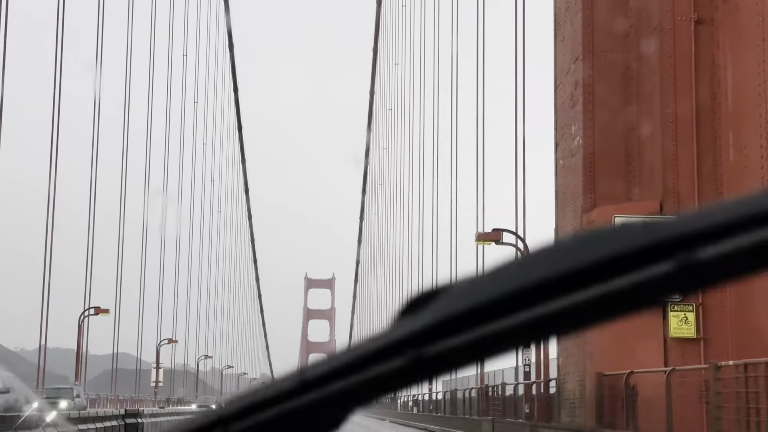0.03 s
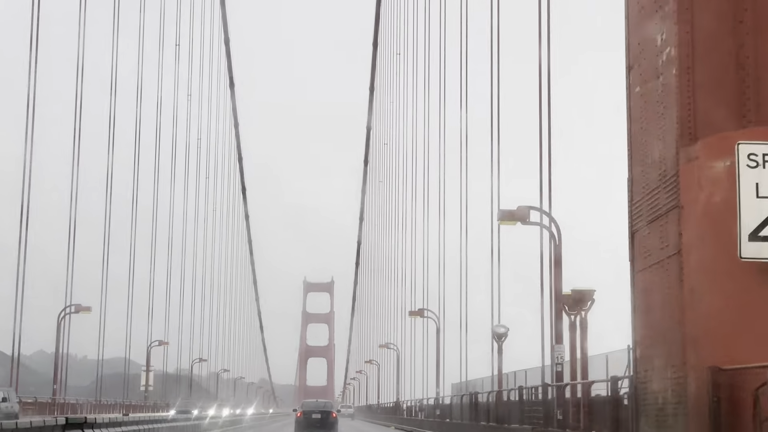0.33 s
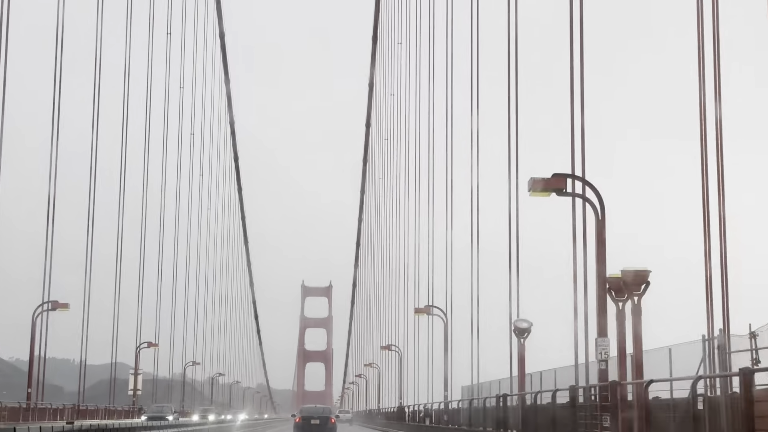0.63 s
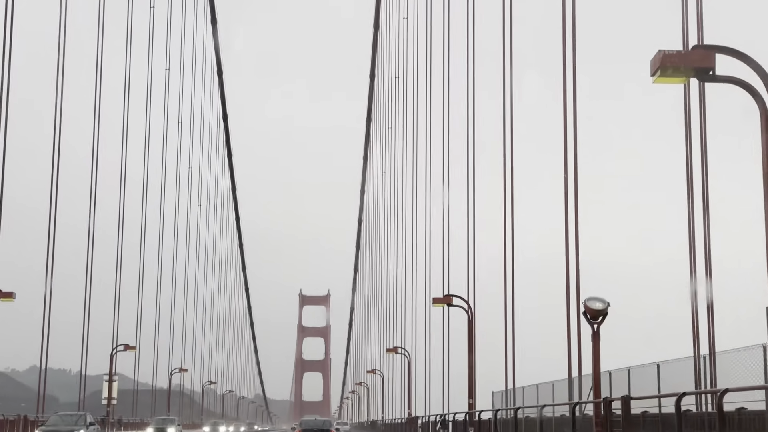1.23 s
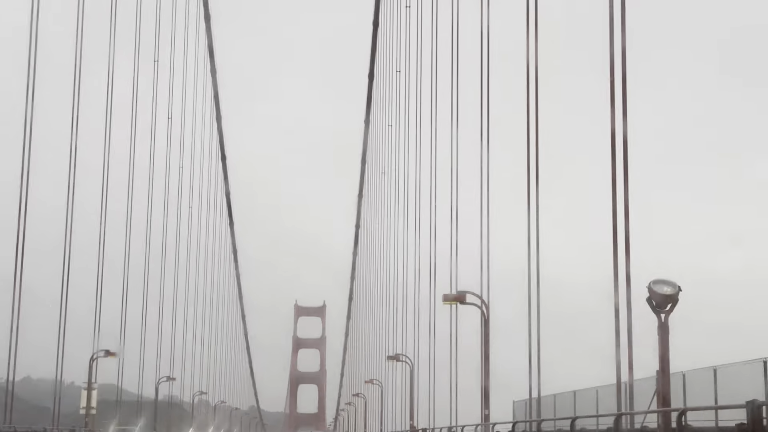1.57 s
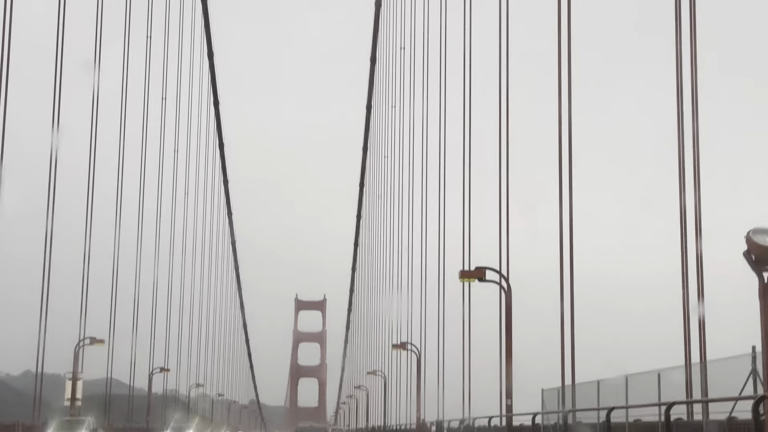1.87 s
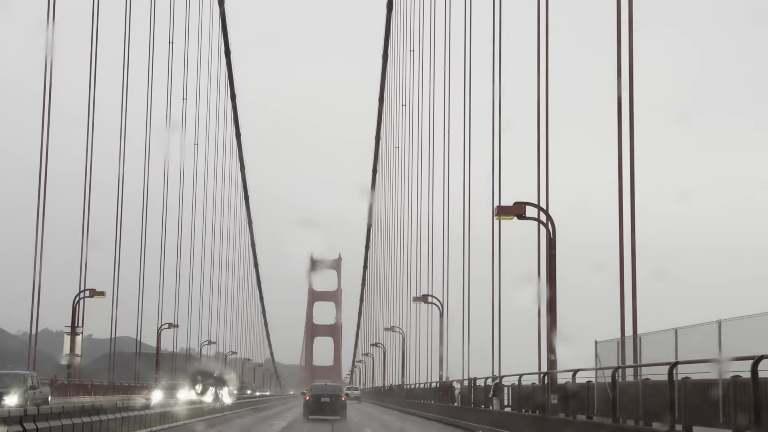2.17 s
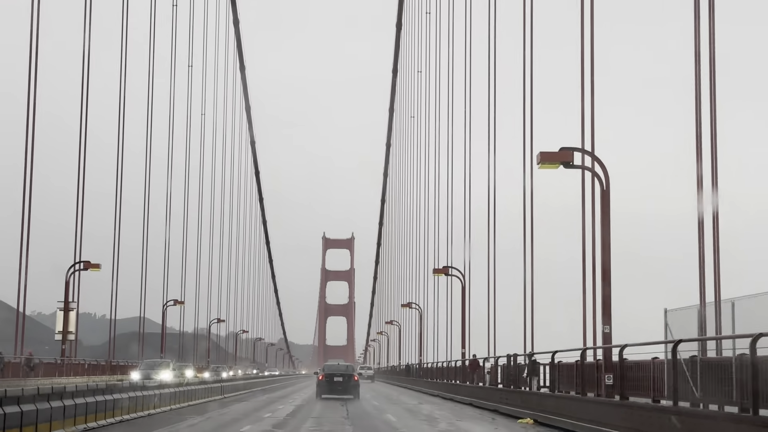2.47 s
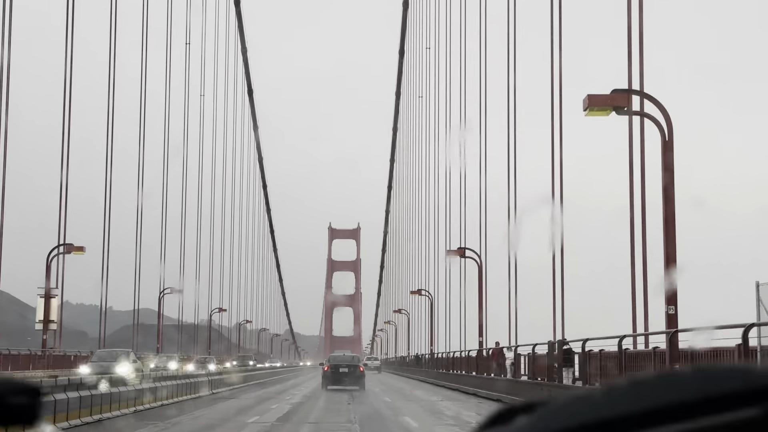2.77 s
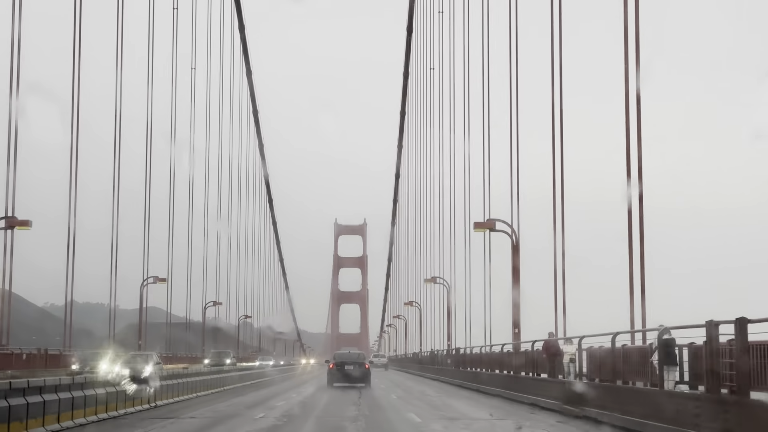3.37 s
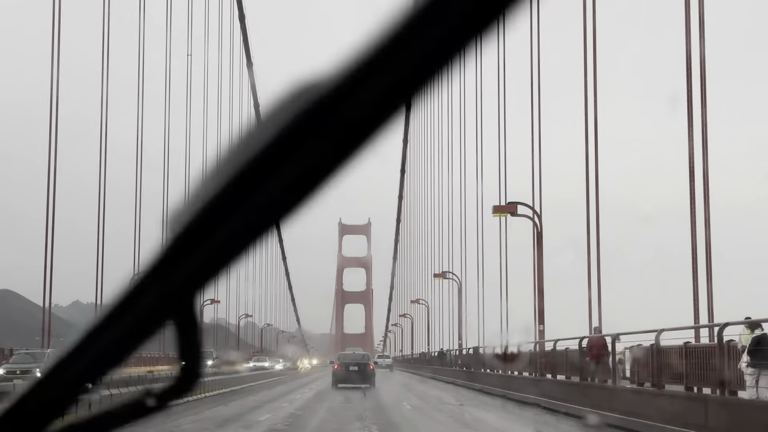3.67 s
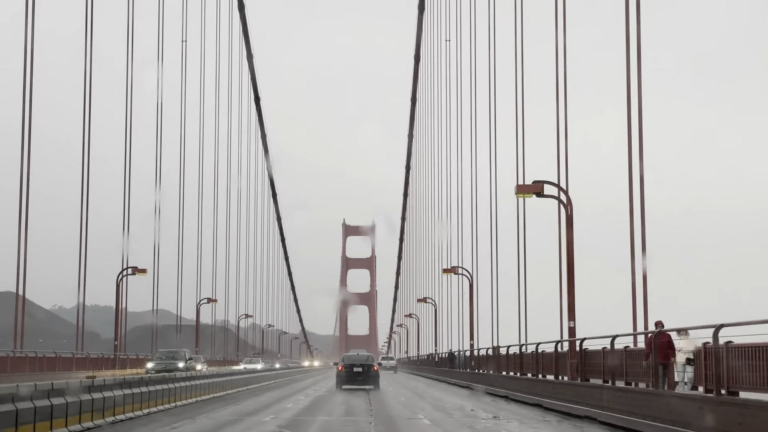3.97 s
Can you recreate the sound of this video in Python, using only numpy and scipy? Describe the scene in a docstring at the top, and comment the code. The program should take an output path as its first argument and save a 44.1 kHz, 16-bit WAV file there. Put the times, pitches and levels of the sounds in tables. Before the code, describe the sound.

Tyre rumble inside a car on a wet road, with rain pattering on the windscreen.

```python
"""Tyres rumble through the cabin of a car crossing a bridge in the rain. They slap over joints in the
deck, and bumps make the cabin boom. Rain ticks on the windscreen, each drop ringing the glass briefly:
a few stray drops in the lee of a tower, then a dense patter from 1.2 s on, with dull taps on the roof.
The wipers sweep up and back once; their rubber moans, then sticks and slips with a groan."""
import sys
import numpy as np
from scipy import signal
from scipy.fft import rfft, irfft
from scipy.io import wavfile
from scipy.ndimage import uniform_filter1d, minimum_filter1d

SR = 44100
rng = np.random.default_rng(int(sys.argv[2]) if len(sys.argv) > 2 else 0)


def put_to_file(sound):
    """Save the sound as 16-bit audio at rate SR, in the file named by the first command-line argument."""
    columns = np.atleast_2d(sound).T  # one column per channel
    safe = np.clip(columns, -1, 1)
    whole_steps = np.round(safe * 32767)
    wavfile.write(sys.argv[1], SR, whole_steps.astype(np.int16))


N = 176400
T = np.arange(N) / SR

# the rumble as the deck changes: t/s, bass level/dB, relative cabin boom level/dB
RUMBLE_LEVELS = [(0, -11.5, -11), (0.05, -22, -22), (0.13, -14.5, -20), (0.23, -22, -21.5),
                 (0.42, -14.5, -19.5), (0.53, -17.5, -16), (0.59, -21, -18.5), (0.65, -11, -19),
                 (0.72, -17, -15.5), (0.78, -21.5, -21), (0.85, -12, -16.5), (0.99, -13.5, -17),
                 (1.12, -18, -21.5), (1.34, -15.5, -21.5), (1.55, -12.5, -19), (1.68, -18.5, -19),
                 (1.79, -10.5, -21.5), (1.9, -16, -16), (2.05, -16.5, -16.5), (2.12, -19.5, -20),
                 (2.27, -17.5, -19.5), (2.37, -16.5, -21.5), (2.69, -15, -21.5), (2.8, -17, -21),
                 (2.95, -17, -16.5), (3.05, -18, -21.5), (3.16, -9, -15.5), (3.23, -22.5, -20.5),
                 (3.3, -11, -17), (3.41, -22, -19), (3.48, -14, -20.5), (3.62, -22.5, -19),
                 (3.72, -20, -22), (3.8, -14.5, -16.5), (3.86, -18.5, -19), (3.95, -15, -22.5),
                 (4.0, -21, -18.5)]
# the roar of the tyres: t/s, tread drone level/dB, relative wet rush level/dB
ROAR_LEVELS = [(0.02, -31, -38), (0.19, -32.5, -41.5), (0.46, -30.5, -38.5), (0.76, -33, -40.5),
               (0.84, -30.5, -39), (0.95, -32.5, -40), (1.08, -33, -41), (1.46, -28, -39), (1.83, -35, -39),
               (2.0, -26, -38.5), (2.04, -32.5, -41), (2.42, -27.5, -39.5), (2.69, -30.5, -40),
               (3.88, -27.5, -40), (4.0, -32, -40.5)]
# the tread blocks singing near 1 kHz: t/s, level/dB
SING_LEVELS = [(0, -51), (1.15, -53.5), (1.3, -51), (1.6, -54.5), (2.4, -47.5), (3.0, -44.5), (4, -51.5)]
# tone of the car body's deep rumble: f/Hz, relative level/dB
BASS_TONE = [(15, -32.5), (26, -34.5), (34, -14.5), (44, -7.5), (54, -4), (63, 0.5), (75, -4), (88, -1),
             (105, -3), (125, -15.5), (170, -44)]
# tone of the cabin's boom: f/Hz, relative level/dB
BOOM_TONE = [(85, -9.5), (120, 1), (145, 0), (175, -6), (195, -2), (215, -3), (245, -12), (300, -17.5),
             (400, -46.5)]
# tone of the tread's drone: f/Hz, relative level/dB
TREAD_TONE = [(250, -24), (315, -11), (355, 1.5), (400, -1), (435, -6), (465, -8.5), (510, -15.5),
              (700, -41.5)]
# tone of the rush on the wet road: f/Hz, relative level/dB
RUSH_TONE = [(250, -11), (520, 1.5), (620, 0.5), (780, -1), (980, -1), (1170, -6.5), (1350, -9.5),
             (1580, -14.5), (2200, -19), (3200, -26), (5000, -35), (9500, -37.5), (11500, -49),
             (16000, -52)]
# tone of the singing tread blocks: f/Hz, relative level/dB
SING_TONE = [(650, -16), (850, 1), (980, -1.5), (1150, -7), (1370, -7.5), (1600, -27)]
# drones of the cabin and of the air inside the tyres: f/Hz, width/Hz, average level/dB
DRONES = [(85.57, 2.95, -23), (197.7, 6, -30.5)]
# how wide the cabin noise sounds: f/Hz, side minus middle level/dB
STEREO_WIDTH = [(35, -27), (85, -22.5), (170, -17.5), (270, -8.5), (400, -9), (520, -4), (750, -5),
                (1100, -2.5), (1500, -7), (2100, -21), (5000, -12.5)]
# which way the cabin noise leans: f/Hz, left minus right level/dB
STEREO_BALANCE = [(40, 0.5), (90, -0.5), (170, -1), (350, 1.7), (700, -0.1), (1200, 1.2), (2000, 0.5)]
# strength of the patter on the windscreen: t/s, level/dB
PATTER_LEVELS = [(0, -76), (.28, -66), (.35, -78.5), (.55, -62), (.66, -73.5), (.8, -74.5), (.87, -58.5),
                 (.93, -63), (1.175, -65), (1.195, -56.5), (1.215, -50.5), (1.25, -44), (1.38, -50.5),
                 (1.44, -45.5), (1.62, -48.5), (1.8, -51.5), (1.93, -48.5), (2.02, -54), (2.14, -52),
                 (2.23, -45.5), (2.31, -52), (2.43, -52.5), (2.6, -47.5), (2.69, -50.5), (2.78, -51),
                 (2.9, -51), (3.1, -53.5), (3.24, -48.5), (3.275, -60.5), (3.33, -53.5), (3.49, -48),
                 (3.54, -48), (3.62, -50), (3.7, -52), (3.86, -50), (3.92, -43.5), (4, -51)]
# tone of the patter: f/Hz, relative level/dB
PATTER_TONE = [(500, -15), (1300, -11), (2100, 0.5), (3200, 1.5), (5500, 0), (7000, 0.5), (8300, 3),
               (10000, -2), (11500, -12), (15500, -12)]
# big drops on the glass, all levels relative: t/s, peak/dB, body at 2-3 kHz/dB, top from 12 kHz/dB
HEAVY_DROPS = [(0.2438, -48, -9, -24), (0.371, -42.5, -6, -34), (0.439, -35.5, -15, -21),
               (0.4492, -32.5, -13, -29.5), (0.5715, -38.5, -8, -21), (0.597, -45.5, -11.5, -28),
               (0.957, -40, -6, -18), (1.065, -47, -3, -12), (1.214, -42.5, -12, -23),
               (1.246, -31, -19, -30), (1.2864, -38, -15, -20), (1.3326, -33, -16, -17),
               (1.3575, -36, -15, -25), (1.4384, -35.5, -8, -15), (1.4594, -37, -11, -19),
               (1.4834, -32.5, -9, -19.5), (1.5855, -26.5, -14, -15), (1.633, -30, -16, -11),
               (1.7044, -29, -14, -13), (1.711, -22.5, -11, -13), (1.7515, -28, -3, -18.5),
               (1.7752, -35, -15, -17), (1.7955, -32.5, -21, -22), (1.834, -28.5, -12, -36),
               (1.8414, -34, -9, -26), (1.884, -30, -14, -26), (1.9287, -32.5, -22, -23),
               (2.0885, -33, -11.5, -25), (2.1859, -34, -18, -24), (2.2097, -33, 1, -25),
               (2.2258, -29, -15, -19), (2.2742, -35, -13, -20), (2.3595, -31.5, -13, -20),
               (2.529, -26, -15, -22), (2.581, -31.5, -22, -19), (2.6032, -32, -19, -17),
               (2.618, -25, -16, -17), (2.6449, -38, -16, -12), (2.703, -40, -14, -13),
               (2.806, -35, -18, -26), (2.9557, -35.5, -10, -30), (2.9879, -32, -13, -24),
               (3.0142, -35, -12, -17), (3.051, -35, -13, -18), (3.067, -37, -11, -23),
               (3.088, -28.5, -19, -21), (3.102, -32.5, -18, -29), (3.1547, -34.5, -17, -21),
               (3.172, -38, -16, -19), (3.19, -28, -16, -19), (3.2427, -31, -22, -15),
               (3.302, -31.5, -10, -22), (3.3545, -30.5, -16, -23), (3.3798, -29, -17, -22),
               (3.4134, -38, -19, -14), (3.4258, -30, -14, -15), (3.48, -30.5, -10, -19),
               (3.5793, -26.5, -16, -29.5), (3.602, -29, -13, -26), (3.6246, -32, -19, -20),
               (3.6455, -33, -15, -17), (3.666, -38, -18, -20), (3.8086, -30, -10, -17.5),
               (3.85, -30, -19, -19), (3.9041, -22.5, -21, -17), (3.925, -25.5, -32, -12.5),
               (3.9414, -28, -11, -23.5), (3.985, -30.5, -19, -14)]
# the tyres hit joints in the deck: t/s, level/dB
DECK_JOINTS = [(.487, -31.5), (0.809, -31), (1.98, -35)]
# tone of their slap: f/Hz, relative level/dB
SLAP_TONE = [(200, 1.5), (500, -0.5), (900, 3), (1200, -14), (1800, -28.5), (4000, -52)]
# bumps that make the cabin boom: middle t/s, half length/s, f/Hz, level/dB
BUMPS = [(0.54, 0.037, 86.7, -9.5), (0.656, 0.029, 55, -11), (0.647, 0.022, 97, -16.5),
         (0.672, .04, 200, -15), (0.864, 0.039, 200, -17.5), (0.878, 0.066, 94.33, -14),
         (.92, 0.053, 63, -18), (0.974, 0.11, 193, -19), (1.038, 0.034, 59, -11.5), (1.47, 0.05, 78.3, -18),
         (1.575, 0.04, 87, -14.5), (1.692, 0.031, 63.4, -9), (1.89, 0.034, 90.2, -14.5),
         (2.01, 0.019, 103, -10.5), (2.542, 0.028, 84.96, -11), (3.3, 0.034, 52, -13),
         (3.858, .03, 125.2, -16.5), (3.947, 0.021, 85.5, -14)]
# moans of the wiper rubber: middle t/s, half length/s, f/Hz, level/dB
WIPER_MOANS = [(0.893, 0.074, 296, -32), (0.978, 0.053, 457, -36.5), (1.461, 0.037, 227, -20),
               (1.592, 0.1, 264, -25.5)]
# drops on the roof and trim: t/s, f/Hz, level/dB
ROOF_TAPS = [(1.433, 2200, -43.5), (1.752, 2000, -41), (1.834, 3200, -50), (1.861, 1250, -38),
             (1.965, 1850, -45), (2.211, 2200, -48), (2.505, 830, -29.5), (3.305, 3300, -44),
             (3.342, 1850, -41.5), (3.729, 2900, -45.5)]
# the deepest bass is weakened: f/Hz, gain/dB
BASS_CUT = [(15, -25), (25, -4), (36, 0.5)]
# how far the left channel's treble runs ahead of the right's: f/Hz, phase/rad
TREBLE_PHASE = [(2200, 0.0), (3200, 0.55), (4000, 0.47), (5300, 0.0), (6600, 0.08), (7300, 1.24),
                (7850, 2.87), (8300, 3.13), (8700, 2.85), (9300, 1.39), (10300, 0.77), (11200, 0.07),
                (13000, -0.19), (15800, -2.3)]


def from_db(db):
    """Turn decibels into a gain."""
    return 10 ** (np.asarray(db) / 20)


def rms_one(x):
    """Scale a sound so that its average strength (rms) is 1."""
    return x / np.sqrt(np.mean(x ** 2) + 1e-20)


def in_time(rows):
    """Draw each column of a table as a line through every sample."""
    times, *columns = np.transpose(rows)
    return [np.interp(T, times, column) for column in columns]


def at_bins(points, size=N):
    """Read a table at every frequency of a spectrum, joining its points on a log scale."""
    hz, value = np.transpose(points)
    bin_hz = np.arange(size // 2 + 1) * SR / size
    return np.interp(np.log(bin_hz + 1e-9), np.log(hz), value)


def colour(x, tone):
    """Filter a sound by a table of f/Hz, gain/dB."""
    size = x.shape[-1]
    return irfft(rfft(x) * from_db(at_bins(tone, size)), size)


def evened(x, window_s=0.081, share=0.64):
    """Partly even out slow swings in level, then scale to rms 1."""
    power = np.mean(np.atleast_2d(x) ** 2, axis=0)
    slow_power = uniform_filter1d(power, int(window_s * SR))
    return rms_one(x / slow_power ** (share / 2))


def swell(middle_s, half_s):
    """A bell-shaped rise and fall."""
    return np.exp(-((T - middle_s) / half_s) ** 2)


def wobble(step_s):
    """A random line that reaches a new value every step."""
    return np.interp(T / step_s, np.arange(N), rng.standard_normal(N))


def sine(hz):
    """A pure tone of rms 1 on a steady or moving pitch."""
    cycles = np.cumsum(hz * np.ones(N)) / SR
    return np.sqrt(2) * np.sin(2 * np.pi * (cycles + rng.random()))


def resonance(hz, width_hz):
    """Noise that rings around one pitch, at rms 1."""
    distance = (np.arange(N // 2 + 1) * SR / N - hz) / width_hz
    return rms_one(irfft(rfft(rng.standard_normal(N)) / (1 + distance ** 4), N))


def cabin_noise(tone, fall_db_per_octave=24):
    """Stereo noise from all around, at rms 1, dying away above the tone table's last point."""
    last_hz, last_db = tone[-1]
    ten_octaves_up = (last_hz * 2 ** 10, last_db - 10 * fall_db_per_octave)
    middle, side = colour(rng.standard_normal((2, N)), list(tone) + [ten_octaves_up])
    left_right = np.array([[1], [-1]])
    spectra = rfft(middle) + rfft(side) * from_db(at_bins(STEREO_WIDTH)) * left_right
    balance = from_db(at_bins(STEREO_BALANCE) * left_right / 2)
    return evened(irfft(spectra * balance, N))


def road_noise(drone_share=0.8):
    """Tyres on the wet deck shake the body and cabin, while their tread drones and sings."""
    bass_db, boom_db = in_time(RUMBLE_LEVELS)
    tread_db, rush_db = in_time(ROAR_LEVELS)
    sing_db, = in_time(SING_LEVELS)
    bass = from_db(bass_db) * cabin_noise(BASS_TONE)
    boom = from_db(boom_db + 0.5) * cabin_noise(BOOM_TONE)
    tread = from_db(tread_db) * cabin_noise(TREAD_TONE)
    rush = from_db(rush_db + 2) * cabin_noise(RUSH_TONE)
    sing = from_db(sing_db) * cabin_noise(SING_TONE)
    shake_db = drone_share * (boom_db - boom_db.mean())   # the drones rise and fall with the boom
    drones = sum(from_db(db + shake_db) * evened(resonance(hz, width)) for hz, width, db in DRONES)
    return bass + boom + tread + rush + sing + drones


def glass_tick(ring_db, decay_s=0.0045, size=1024):
    """One drop on glass: a sharp click and a short ring, different at every spot."""
    age = np.arange(size)
    click = age == 0
    ring = rng.standard_normal(size) * np.exp(-age / SR / decay_s)
    return click + from_db(ring_db) * ring / np.sqrt(np.sum(ring ** 2))


def rain_patter(drops_per_s=750, spots=12, spray_db=-11.5, flurry_db=1.06):
    """Drops of random size land in brief flurries on spots of the windscreen, over fine spray."""
    size_db = np.minimum(3.5 * rng.exponential(1, N), 13.5)   # many small drops, few large ones
    hits = from_db(size_db) * (rng.random(N) < drops_per_s / SR)
    spot = rng.integers(0, spots, N)
    ticks = np.zeros(N)
    for k in range(spots):
        ticks += (-1) ** k * signal.fftconvolve(hits * (spot == k), glass_tick(ring_db=-3))[:N]
    spray = from_db(spray_db) * rng.standard_normal(N)
    rain = colour(rms_one(ticks) + spray, PATTER_TONE)
    rain_db, = in_time(PATTER_LEVELS)
    return from_db(rain_db + flurry_db * wobble(step_s=0.014)) * rms_one(rain)


def heavy_drops(peak_lift_db=9, body_lift_db=12.5, top_lift_db=9.5):
    """Big drops hit the glass and stand out from the patter, some dull and some bright."""
    out = np.zeros(N + SR)
    margin = 256   # silent samples on each side give the filter room
    for s, peak_db, body_db, top_db in HEAVY_DROPS:
        body, top = body_db + body_lift_db, top_db + top_lift_db
        tone = [(500, -23.5), (1800, body), (3200, body), (5000, -2.5), (7000, -0.5),
                (10000, 5 + 0.48 * top), (12000, top)]
        hit = colour(np.pad(glass_tick(ring_db=-1.5), margin), tone)
        start = int(s * SR) - margin
        out[start:start + len(hit)] += from_db(peak_db + peak_lift_db) * hit / np.abs(hit).max()
    return out[:N]


def joint_slaps(rise_s=0.0021, decay_s=0.05):
    """The tyres give a short, dull slap at each joint in the deck."""
    level = np.zeros(N)
    for s, db in DECK_JOINTS:
        rise = np.clip((T - s) / rise_s, 0, 1)
        level += from_db(db) * rise * np.exp(-np.abs(T - s) / decay_s)
    return level * cabin_noise(SLAP_TONE)


def bump_booms():
    """Each bump makes one low note of the cabin swell and fade."""
    return sum(from_db(db) * swell(s, half_s) * sine(hz) for s, half_s, hz, db in BUMPS)


def wipers(groan_s=1.575, groan_hz=470, sag_hz_per_s=220, groan_db=-29.5, slip_s=0.009):
    """The rubber moans where the blade moves fastest; on the way back it sticks, slips and groans."""
    moans = sum(from_db(db) * swell(s, half_s) * evened(resonance(hz, width_hz=29))
                for s, half_s, hz, db in WIPER_MOANS)
    sagging_hz = groan_hz - sag_hz_per_s * (T - groan_s)
    # the changing grip shakes both pitch and level
    pitch_hz = sagging_hz * (1 + 0.016 * wobble(slip_s))
    level = from_db(groan_db + 2 * wobble(slip_s)) * swell(groan_s, half_s=0.057)
    return moans + level * sine(pitch_hz)


def roof_taps(decay_s=0.0086):
    """Drops on the padded roof give a short, dull knock."""
    out = np.zeros(N)
    for s, hz, db in ROOF_TAPS:
        decay = (T >= s) * np.exp(-np.abs(T - s) / decay_s)
        out += from_db(db) * decay * resonance(hz, width_hz=0.35 * hz)
    return out


def scene():
    """The road is all around; glass, bumps, wipers and roof are in the middle."""
    return (road_noise() + rain_patter() + heavy_drops() + joint_slaps()
            + bump_booms() + wipers() + roof_taps())


def record(dry, fade_s=0.004, ceiling=0.92, cutoff_hz=15800):
    """The deepest bass is thinned, and the recorder's stereo processing shifts the treble's phase between left
    and right. Peaks are held down and the highest treble is cut."""
    to_edge_s = np.minimum(T, T[::-1])
    fade = np.sin(np.pi / 2 * np.minimum(1, to_edge_s / fade_s)) ** 2
    phase_shift = np.exp(0.5j * at_bins(TREBLE_PHASE) * [[1], [-1]])
    x = irfft(rfft(colour(dry, BASS_CUT) * fade) * phase_shift, N)
    safe_gain = np.minimum(1, ceiling / (np.abs(x).max(axis=0) + 1e-9))
    smooth_gain = uniform_filter1d(minimum_filter1d(safe_gain, size=600), size=600)
    low_pass = signal.ellip(12, 0.1, 90, cutoff_hz, fs=SR, output="sos")
    return signal.sosfilt(low_pass, x * smooth_gain)


dry = scene()
out = record(dry)
put_to_file(out)
```